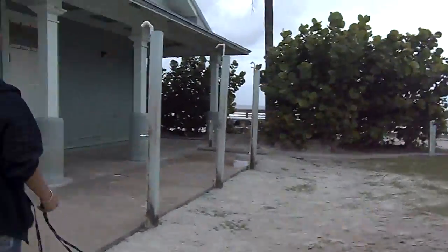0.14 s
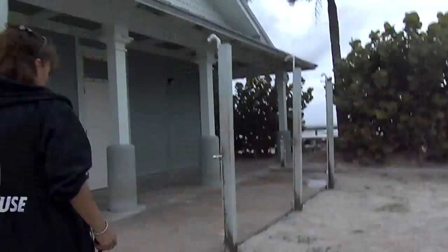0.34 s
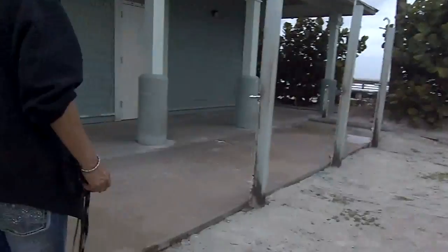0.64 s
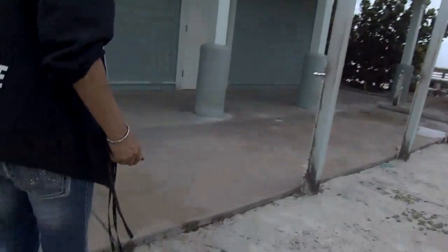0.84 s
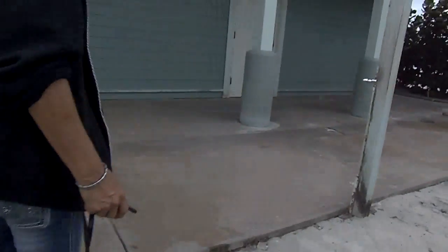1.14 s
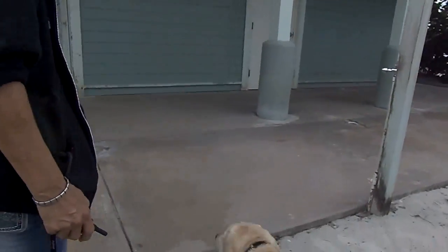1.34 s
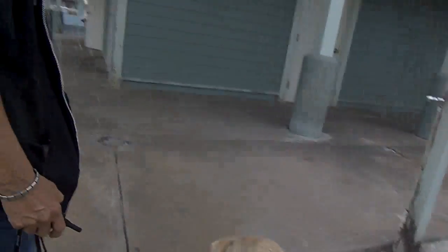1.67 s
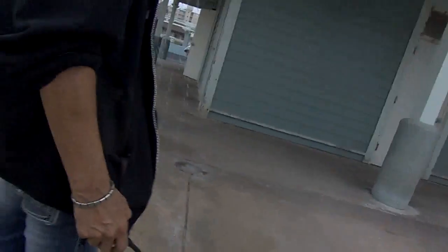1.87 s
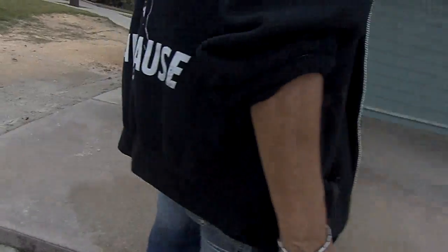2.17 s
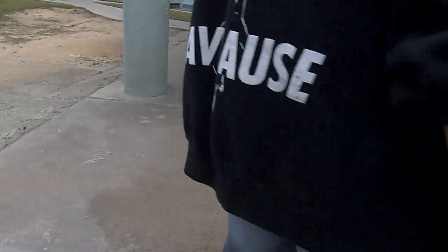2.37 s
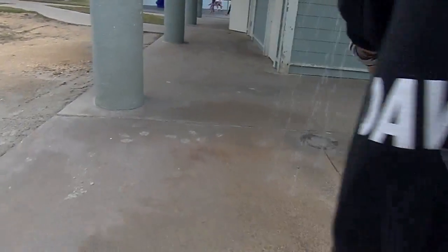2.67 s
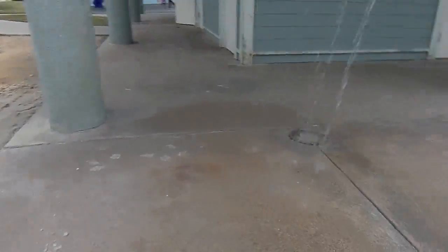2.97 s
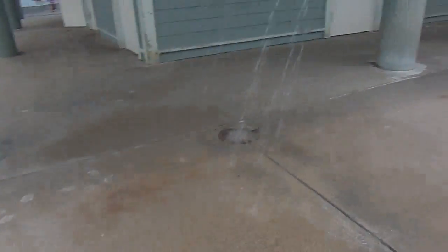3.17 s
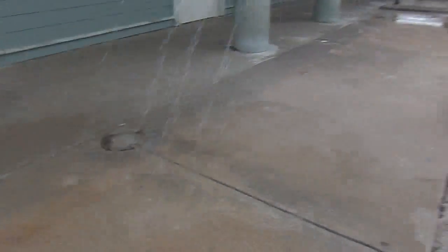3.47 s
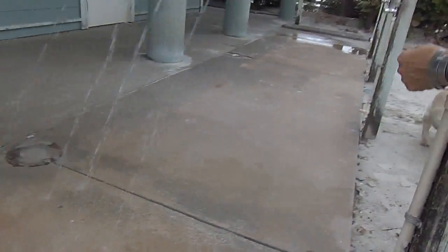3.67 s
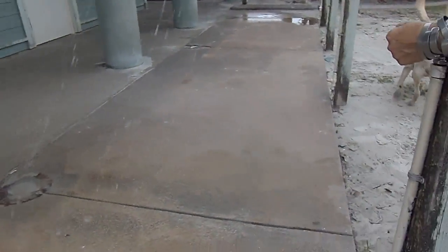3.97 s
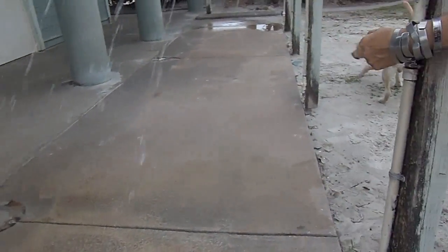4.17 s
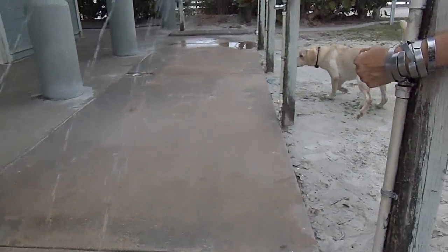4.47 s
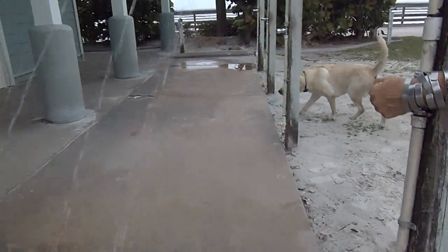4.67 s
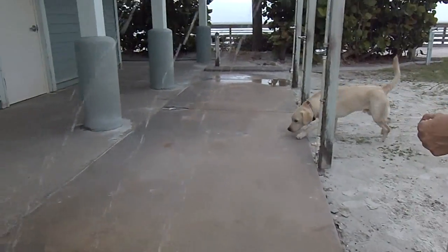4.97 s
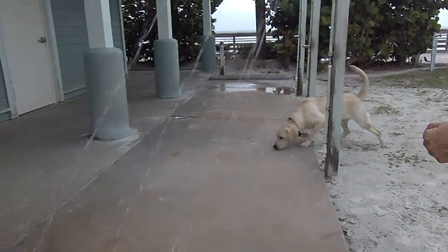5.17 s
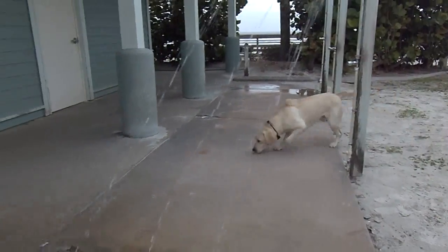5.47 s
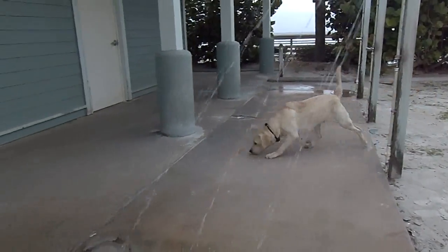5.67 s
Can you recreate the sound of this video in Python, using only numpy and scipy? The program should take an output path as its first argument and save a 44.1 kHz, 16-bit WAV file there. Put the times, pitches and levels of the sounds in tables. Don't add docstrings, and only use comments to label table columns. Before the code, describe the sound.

Surf and wind rumble give way to bright, close shower spray spattering on a hard slab, briefly breaking into drips before returning.

```python
import sys
import numpy as np
from scipy import signal
from scipy.fft import rfft, irfft, next_fast_len
from scipy.io import wavfile
from scipy.ndimage import uniform_filter1d, map_coordinates

SR = 44100
rng = np.random.default_rng(int(sys.argv[2]) if len(sys.argv) > 2 else 0)


def volts_from_db(level):
    exponent = np.asarray(level, float) / 20
    return 10 ** exponent


def pcm_store(signal):
    levels = np.round(np.clip(np.atleast_2d(signal), -1, 1) * 32767)
    wavfile.write(sys.argv[1], SR, levels.astype(np.int16).T)


N = 256662


def unit(x):
    return x / np.sqrt(np.mean(x ** 2) + 1e-20)


def along(points, hz):
    f, v = np.transpose(points)
    return np.interp(np.log(hz + 1), np.log(f + 1), v)


def curves(rows):
    s, *columns = np.transpose(rows)
    return [np.interp(np.arange(N) / SR, s, column) for column in columns]


def bumps(rows):
    t = np.arange(N) / SR
    return sum(db * np.exp(-((t - s) / width) ** 2) for s, db, width in rows)


def wobble(rate):
    knots = rng.standard_normal(int(N * rate / SR) + 4)
    return map_coordinates(knots, [np.arange(N) * rate / SR])


def filtered(x, gain):
    m = next_fast_len(N + 8192)
    return irfft(rfft(x, m) * gain(np.fft.rfftfreq(m, 1 / SR)), m)[..., :N]


def above(x, edge_hz):
    return filtered(x, lambda hz: 1 / (1 + (edge_hz / (hz + 1)) ** 4))


def coloured(x, spectrum):
    low_end = [(spectrum[0][0] / 2, -120)]
    high_end = [(spectrum[-1][0] * 2, -120)]
    closed = low_end + list(spectrum) + high_end
    return unit(filtered(x, lambda hz: volts_from_db(along(closed, hz))))


def rush(spectrum, patchy_db):
    z = signal.stft(rng.standard_normal(N), nperseg=512)[2]
    field = uniform_filter1d(rng.standard_normal(z.shape), 6, 0)
    field = uniform_filter1d(field, 12, 1)
    noise = signal.istft(z * volts_from_db(patchy_db * unit(field)), nperseg=512)[1][:N]
    return coloured(noise, spectrum)


def patter(count, spread_db, life, size):
    place, strength, length = rng.random((count, 3)).T
    lives = life * np.exp(0.86 * (length - 0.5))
    u = np.arange(size) / SR / lives[:, None]
    peaks = volts_from_db(-spread_db * np.log(strength + 0.029))
    rows = peaks[:, None] * u * np.exp(-u) * rng.standard_normal(u.shape)
    at = (place * N).astype(int)[:, None] + np.arange(size)
    return np.bincount(at.ravel(), rows.ravel(), N + size)[:N]


def grains(s, db, hz, cycles, size, glide=0., ragged=0.):
    t = np.arange(size) / SR
    u = t * (hz / cycles)[:, None]
    start_turn = 0.074 + np.minimum(ragged, 0.4) * rng.standard_normal((len(s), 1))
    turn = hz[:, None] * t * (1 + glide * u) + start_turn
    tone = np.sin(2 * np.pi * turn) + ragged * rng.standard_normal(u.shape)
    envelope = np.e * 3 * u * np.exp(-3 * u)
    rows = volts_from_db(db)[:, None] * envelope * tone
    at = np.round(s * SR).astype(int)[:, None] + np.arange(size)
    return np.bincount(at.ravel(), rows.ravel(), N + size + SR)[:N]


def behind_building(hidden, open_db, loss_db, power):
    return open_db + loss_db * hidden ** power


# (frequency [Hz], density [dB])
SURF_SPECTRUM = [(45, -16), (70, -1.5), (130, -0.5), (220, -2), (330, -15)]
BREAKER_SPECTRUM = [(170, -9.5), (270, 1), (450, -2.5), (700, -11.5), (1000, -17)]


def surf(hidden, gust_db):
    rumble_db = behind_building(hidden, open_db=-37.5, loss_db=-10, power=2.5)
    breakers_db = behind_building(hidden, open_db=-36.5, loss_db=-17, power=2)
    gust_share = 0.35
    rumble = volts_from_db(rumble_db + gust_share * gust_db) * rush(SURF_SPECTRUM, patchy_db=-0.08)
    return rumble + volts_from_db(breakers_db) * rush(BREAKER_SPECTRUM, patchy_db=0.28)


# (frequency [Hz], density [dB])
WASH_SPECTRUM = [(450, -14.5), (700, -0.5), (1200, -4.5), (2500, -9), (6000, -20), (14000, -39)]
# (time [s], rise [dB], half width [s])
WAVES = [
    (0.33, 5, 0.067),
    (0.014, 1, 0.035),
]


def wash(hidden):
    level_db = behind_building(hidden, open_db=-41, loss_db=-16.5, power=1.05)
    return volts_from_db(level_db + bumps(WAVES)) * rush(WASH_SPECTRUM, patchy_db=1.6)


# (frequency [Hz], density [dB])
BUFFET_SPECTRUM = [(12, -20), (25, 0), (60, 2), (110, -14)]


def wind(hidden, gust_db):
    level_db = behind_building(hidden, open_db=-45, loss_db=-5.5, power=0)
    return volts_from_db(level_db + gust_db + 3.2 * wobble(7.8)) * rush(BUFFET_SPECTRUM, patchy_db=-1.4)


# (time [s], hidden share [0-1])
HIDDEN = [(0, 0.13), (.88, 0.01), (1.08, 0.36), (1.27, 0.13), (1.62, 0.38), (1.97, 0.54), (2.76, 0.64),
          (2.91, 0.84), (3.74, .95), (4.13, 0.98), (4.8, 1), (5.82, 0.83)]
# (time [s], rise [dB], half width [s])
GUSTS = [
    (0, 18.5, .05),
    (.225, 17.5, .07),
    (.5, 10, 0.065),
    (.6, 13, 0.043),
    (1.27, 7, 0.087),
    (1.9, -1, 0.052),
    (2.78, 3.5, 0.21),
    (3.2, 8, .06),
]


def sea():
    hidden = np.clip(curves(HIDDEN)[0], 0, 1)
    gust_db = bumps(GUSTS)
    return surf(hidden, gust_db) + wash(hidden) + wind(hidden, gust_db)


# (frequency [Hz], time to fall 60 dB [s])
ROOF_DECAY = [(500, 0.51), (4000, 0.19), (12000, .1)]


def roof(x):
    hz, t, z = signal.stft(rng.standard_normal(SR // 4), SR, nperseg=256)
    fall = volts_from_db(-60 * t / along(ROOF_DECAY, hz)[:, None])
    tail = signal.istft(z * fall, SR, nperseg=256)[1]
    delayed = np.pad(x, (300, 0))
    return signal.fftconvolve(delayed, tail / np.linalg.norm(tail))[:N]


def whistle(rows, shake, overtones=()):
    hz, db = curves(rows)
    t = np.arange(N) / SR
    gate = np.clip(np.minimum(t - rows[0][0], rows[-1][0] - t) / 0.013, 0, 1)
    turn = 2 * np.pi * np.cumsum(hz * (1 + shake * wobble(69.6))) / SR
    tone = np.sin(turn) + sum(volts_from_db(level) * np.sin(k * turn) for k, level in overtones)
    return np.sqrt(2) * gate * volts_from_db(db + 2.2 * wobble(59.0)) * tone


# (time [s], pitch [Hz], level [dB])
HUM = [
    (0.07, 659, -49),
    (0.17, 657, -47),
    (0.275, 654, -45.5),
]
# (multiple of the pitch, level [dB])
HUM_OVERTONES = [(2, -14), (3, -15), (4, -16)]


def pipe_hum():
    return whistle(HUM, shake=0.004, overtones=HUM_OVERTONES)


# (time [s], pitch [Hz], level [dB])
SQUEAK = [
    (.59, 1225, -45),
    (.66, 1257, -47),
    (.678, 1316, -40),
    (.7, 1208, -37.5),
    (.726, 1265, -38.5),
    (.748, 1220, -37),
    (.77, 1167, -41),
    (.81, 1160, -49),
]


def valve_squeak():
    return whistle(SQUEAK, shake=0.0051)


# (time [s], level [dB], dull splatter over that level [dB])
STREAM = [(1.006, -39.5, -2.5), (1.15, -30, -9), (1.55, -28, -11.5), (1.74, -29, -12), (2.2, -38, -11),
          (2.32, -39.5, -15), (2.5, -34, -9), (2.69, -26, -19), (2.97, -34.5, -12), (3.05, -33, -14.5),
          (3.6, -33, -14), (3.85, -33.5, -11), (4.04, -39, -13), (4.44, -37.5, -11), (4.75, -38, -13),
          (5.07, -36.5, -8.5), (5.3, -36, -9), (5.82, -35, -11)]
# (peak time [s], level [dB], rise [s], fall [s])
SPURTS = [
    (.385, -41.5, 0.093, 0.057),
    (.5, -38.5, 0.035, 0.047),
    (.615, -42.5, 0.078, 0.096),
    (.81, -36.5, 0.05, .06),
    (.86, -32.5, .04, 0.067),
    (0.917, -33.5, 0.04, 0.072),
]
# (time [s], change [dB], half width [s])
GUSHES = [(1.553, 4, 0.016), (1.634, -1, 0.026), (1.692, 1.6, 0.018), (3.648, 2, 0.034), (3.744, 0, 0.057),
          (3.93, -3.5, 0.032), (4.005, 3, 0.018), (4.55, 3, 0.019), (4.62, -2.5, .02), (4.65, 3, 0.022),
          (5.147, -3.5, 0.044), (5.23, 2, 0.037), (5.306, -1.5, 0.033)]
BREAK_S, BACK_S = 4.045, 4.273


def flow():
    dribble_db, dribble_dull_db = -50, -3
    spurt_span_db = 13
    cut_db, ebb_db_per_s, edge_s = -5.5, -48, 0.008
    t = np.arange(N) / SR
    level_db, dull_db = curves(STREAM)
    spurt_power = 0
    for s, db, rise, fall in SPURTS:
        away = np.maximum((s - t) / rise, (t - s) / fall)
        spurt_power = spurt_power + volts_from_db(db - spurt_span_db * away) ** 2
    start_db = 10 * np.log10(volts_from_db(dribble_db) ** 2 + spurt_power)
    broken = np.clip(np.minimum(t - BREAK_S, BACK_S - t) / edge_s + 0.5, 0, 1)
    ebb_db = cut_db + ebb_db_per_s * (t - BREAK_S)
    level_db = level_db + bumps(GUSHES) + broken * ebb_db
    running = t >= STREAM[0][0]
    return np.where(running, level_db, start_db), np.where(running, dull_db, dribble_dull_db), running


# (frequency [Hz], density [dB])
MIST_SPECTRUM = [(1760, -57), (3000, -17.5), (4090, -16), (4330, -11), (6500, -6.5), (9510, -3.5),
                 (11900, -3), (14000, -6.5)]
# (frequency [Hz], density [dB])
SPLATTER_SPECTRUM = [(1200, -16), (2200, -7.5), (3500, -1), (5000, -0.5), (8000, -4)]


def spray():
    level_db, dull_db, running = flow()
    share_db = -3 + running * np.minimum(0.67 * (-36 - level_db), 7)
    surge_db = 0.36 * wobble(14) + 1.02 * wobble(45)

    mist = volts_from_db(-4.5) * coloured(patter(count=20000, spread_db=2.5, life=0.0001, size=50), MIST_SPECTRUM)
    hiss = volts_from_db(-6.0) * rush(MIST_SPECTRUM, patchy_db=2.0)
    cracks = coloured(patter(count=2600, spread_db=4.0, life=0.00014, size=70), MIST_SPECTRUM)
    fine = mist + hiss + volts_from_db(share_db + 0.5) * cracks

    thuds = coloured(patter(count=900, spread_db=2.5, life=0.00031, size=140), SPLATTER_SPECTRUM)
    splatter = volts_from_db(-4.5) * rush(SPLATTER_SPECTRUM, patchy_db=2.0) + volts_from_db(-4.0) * thuds

    weak_db, strong_db = -53, -36.5
    weak = ~running * np.clip((strong_db - level_db) / (strong_db - weak_db), 0, 1)
    fine = fine - weak * above(fine, edge_hz=9500)
    return volts_from_db(level_db + surge_db) * (fine + volts_from_db(dull_db) * splatter)


def splashes(count):
    per_s, over_stream_db, spread_db = 45, 15, 2.5
    middle_hz, pitch_spread = 9800, 0.22
    chance = rng.standard_normal((count, 3))
    s = STREAM[0][0] + (np.arange(count) + 1 + chance[:, 0] / 2) / per_s
    s = np.clip(s, 0, (N - 1) / SR)
    db = flow()[0][(s * SR).astype(int)] + over_stream_db + spread_db * chance[:, 1]
    db = np.where((s > BREAK_S) & (s < BACK_S), -120, db)
    hz = np.minimum(middle_hz * np.exp(pitch_spread * chance[:, 2]), 13500)
    return np.transpose([s, db, hz])


# (time [s], peak [dB], pitch [Hz], life [cycles])
BUBBLES = [
    (3.843, -42, 1214, 15),
]


def bubble():
    s, db, hz, cycles = np.transpose(BUBBLES)
    return grains(s, db, hz, cycles, size=1800, glide=0.042)


# (time [s], peak [dB])
SLAPS = [
    (0.37, -15.5),
    (0.4114, -17),
    (.4912, -13),
    (0.88, -16),
    (1.7993, -17),
    (2.7415, -26),
    (3.5341, -21),
]


def slaps():
    s, db = np.transpose(SLAPS)
    return above(grains(s, db, 1500 + 0 * s, 0.2 + 0 * s, size=60), edge_hz=870)


# (time [s], peak [dB], pitch [Hz], life [cycles])
PLOPS = [(0.4116, -26, 3540, 3.4), (0.4469, -28, 3110, 2.7), (0.4898, -23, 3520, 1.7),
         (0.598, -20.5, 2530, 2.2), (0.7452, -22.5, 1790, 2.5), (0.7896, -22, 2800, 2.1),
         (0.846, -32, 4500, 3), (0.88, -23, 4330, 1.6), (0.9138, -23, 3970, 2.8), (1.0069, -26, 3820, 6.2),
         (1.0829, -30, 4300, 3), (1.255, -28, 3340, 2.8), (1.3932, -21, 3780, 2.5),
         (1.5436, -21.5, 3560, 2), (1.7983, -36, 3620, 3), (1.7981, -19, 3920, 1.6), (1.8316, -26, 3890, 3),
         (2.829, -39, 4140, 2.8), (2.9776, -24, 4240, 1.9), (3.1413, -39, 3800, 3),
         (3.4189, -19, 3630, 1.6), (3.651, -22.5, 4350, 3), (3.688, -25.5, 3570, 2.4),
         (3.775, -27, 4080, 2.2), (3.993, -34, 4480, 3), (5.033, -28, 4340, 2), (5.0774, -27.5, 3930, 2.9),
         (5.168, -24, 4530, 3), (5.5436, -24, 4460, 3), (5.7229, -35, 4290, 3)]


def plops():
    s, db, hz, cycles = np.transpose(PLOPS)
    return above(grains(s + 0.0011, db - 0.2, hz, cycles, size=300, ragged=0.22), edge_hz=290)


# (time [s], peak [dB], pitch [Hz])
TICKS = [(.0124, -23.5, 10300), (.0453, -34, 8480), (.1204, -40, 9000), (.192, -26, 9000), (.2, -29, 9500),
         (0.394, -23, 11000), (.7517, -30, 8000), (.8274, -18, 8770), (.8796, -7, 6500),
         (1.0204, -14, 11300), (1.0834, -23, 11500)]
# (time [s], peak [dB], pitch [Hz])
DROPS = [(0.3376, -27, 7440), (0.3681, -24, 11500), (0.41, -10, 6700), (0.4469, -10.5, 10400),
         (0.49, -11, 8500), (0.5162, -20, 7950), (0.8118, -20, 6560), (0.8405, -10, 9230),
         (0.8565, -26, 4640), (0.8798, -2, 11600), (1.0066, -14, 11200), (1.262, -13, 10300),
         (1.4456, -13, 8990), (1.5434, -10, 10200), (1.6067, -6, 10600), (1.6801, -7, 10100),
         (1.788, -6, 13100), (1.9904, -7, 12500), (2.4409, -14, 10600), (2.5227, -8, 10200),
         (2.6795, -11, 11600), (2.7402, -6, 9900), (2.8414, -6, 11000), (2.8863, -5, 10100),
         (2.9064, -8, 9550), (2.994, -12, 10600), (3.1414, -8, 11200), (3.4583, -9, 10700),
         (3.5329, -3, 10560), (3.6192, -19, 9840)]
# (time [s], peak [dB], pitch [Hz])
DRIPS = [(3.8516, -9, 11200), (3.9394, -12, 9900), (3.9898, -25, 9710), (4.0652, -18, 7690),
         (4.0871, -21, 7100), (4.1014, -20, 7400), (4.1235, -20, 9800), (4.146, -25, 9980),
         (4.1584, -25, 6050), (4.1684, -22, 9950), (4.1829, -24, 6920), (4.1914, -26, 8510),
         (4.2173, -25, 6260), (4.2757, -21, 5960), (4.2914, -21, 9140), (4.3206, -11, 9200),
         (4.344, -11, 8960), (4.3534, -22, 13100), (4.3644, -15, 8430), (4.3934, -11.5, 9630),
         (4.5416, -10.5, 8820), (4.8633, -14, 10700), (4.9546, -13, 9470), (5.1672, -17, 9780),
         (5.3223, -11, 5600), (5.4754, -17, 9100), (5.4984, -10, 8990), (5.5174, -21, 8780),
         (5.682, -12, 7960), (5.7229, -13, 7080)]


def cracks_on_slab():
    s, db, hz = np.concatenate([DROPS, DRIPS, TICKS, splashes(count=215)]).T
    return above(grains(s + 0.0012, db - 4.5, hz, 3.3 + 0 * s, size=100, ragged=0.81), edge_hz=3450)


def scene():
    drops = cracks_on_slab() + plops() + slaps() + bubble()
    near = drops + valve_squeak() + pipe_hum()
    return (sea() + volts_from_db(-17.0) * roof(near) + spray() + near)[None]


def top_cut(x):
    return signal.sosfilt(signal.butter(12, 14180, fs=SR, output="sos"), x)


def record(dry):
    return top_cut(dry)


dry = scene()
out = record(dry)
pcm_store(out)
```